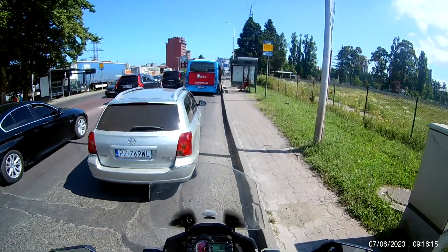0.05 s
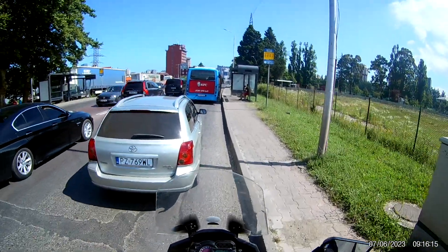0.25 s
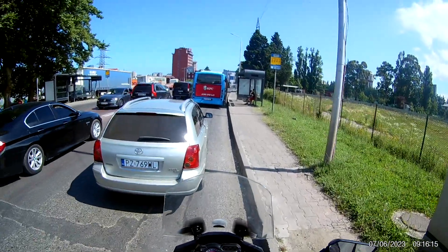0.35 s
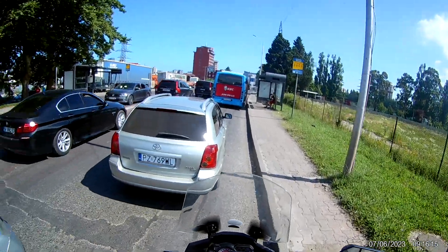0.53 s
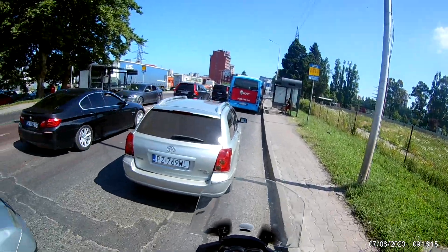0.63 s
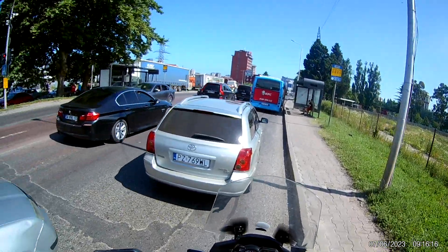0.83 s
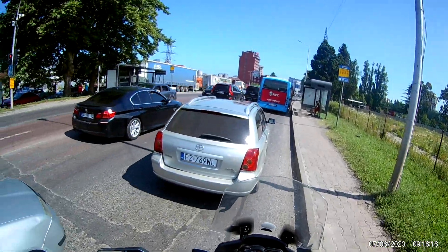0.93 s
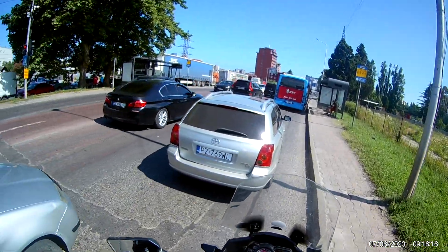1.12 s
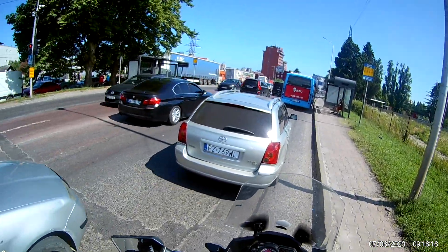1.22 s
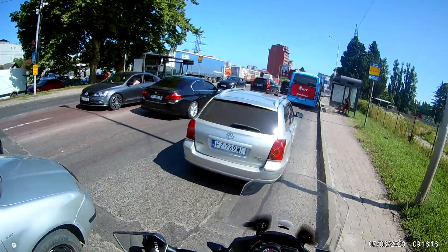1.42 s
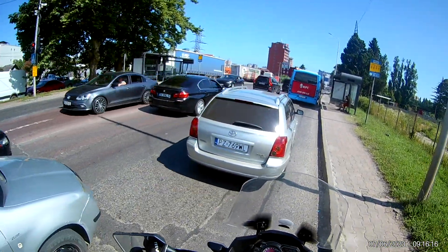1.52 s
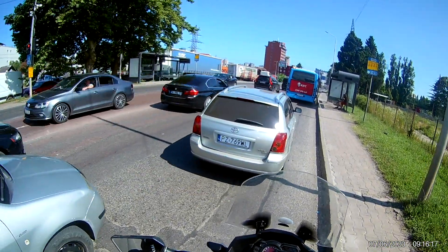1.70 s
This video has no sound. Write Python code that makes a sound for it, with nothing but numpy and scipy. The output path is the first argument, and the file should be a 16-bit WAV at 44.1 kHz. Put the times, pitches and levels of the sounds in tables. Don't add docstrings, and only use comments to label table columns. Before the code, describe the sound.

One nearby electric horn beeps for about a third of a second with faint echoes, over constant low motorcycle idle and muffled traffic; later soft tyre noise passes and a neighbouring engine revs faintly.

```python
import sys
import numpy as np
from scipy import signal
from scipy.io import wavfile
from scipy.ndimage import uniform_filter1d

SR = 44100
rng = np.random.default_rng(int(sys.argv[2]) if len(sys.argv) > 2 else 0)


def ratio_of_db(decibels):
    return 10 ** (np.asarray(decibels, float) / 20)


def transcribe(signal):
    frames = np.atleast_2d(signal).T
    limited = np.clip(frames, -1, 1)
    pcm = np.round(limited * 32767).astype(np.int16)
    wavfile.write(sys.argv[1], SR, pcm)


N = 77175


def walk(rate_hz):
    hold = int(SR / rate_hz)
    steps = np.repeat(rng.standard_normal(N // hold + 1), hold)
    return 4 / 3 * uniform_filter1d(uniform_filter1d(steps, hold), hold)[:N]


def level(x, db):
    return x * ratio_of_db(db) / np.sqrt(np.mean(x ** 2))


def band(hz, width_hz):
    edges_hz = [hz - width_hz / 2, hz + width_hz / 2]
    sos = signal.butter(2, edges_hz, "bandpass", fs=SR, output="sos")
    return signal.sosfilt(sos, rng.standard_normal(N + SR // 2))[-N:]


# frequency in Hz, level in dB per Hz.
ROAR_SPECTRUM = [(25, 5.5), (55, 1), (130, -8), (400, -6.5), (750, -17), (1900, -17), (2900, -25),
                 (4400, -67)]
ROAR_DB, SWELL_DB, FLICKER_DB = -48.5, 0.3, 1.5


def traffic_roar():
    table_hz, table_db = np.array(ROAR_SPECTRUM).T
    roar, swell = 0, walk(0.53)
    for hz in 24 * 2 ** (np.arange(24) / 3):
        db = np.interp(np.log(hz), np.log(table_hz), table_db)
        gain = ratio_of_db(db + SWELL_DB * swell + FLICKER_DB * walk(10.95))
        roar = roar + gain * band(hz, hz / 4)
    return level(roar, ROAR_DB)


# loudest moment in seconds, width in seconds, centre in Hz, bandwidth in Hz.
PASSES = [
    (1.19, .09, 1150, 300),
    (1.36, .04, 1150, 260),
    (1.7, .12, 380, 200),
    (1.65, .08, 980, 120),
    (1.5, .1, 640, 90),
]
PASS_DB = [-57.5, -56, -56.5, -63.5, -60]


def passing_cars(t):
    cars = 0
    for (peak_s, width_s, hz, width_hz), db in zip(PASSES, PASS_DB):
        swell = np.exp(-0.5 * ((t - peak_s) / width_s) ** 2)
        cars = cars + swell * level(band(hz, width_hz), db)
    return cars


DRONE_ON_S, DRONE_RISE_S, DRONE_DB = 1.56, 0.05, -52
DRONE_HZ, DRONE_CLIMB_HZ_S = 241, 50


def revving_neighbour(t):
    age = np.clip(t - DRONE_ON_S, 0, 9)
    hz = DRONE_HZ + DRONE_CLIMB_HZ_S * age + 3 * walk(25.3)
    drone = np.sin(2 * np.pi * np.cumsum(hz) / SR)
    return drone * np.clip(age / DRONE_RISE_S, 0, 1) * ratio_of_db(DRONE_DB + 2.1 * walk(19.6))


# time in seconds, firings per second.
IDLE_SPEED = [(.13, 36.6), (.345, 37.2), (.56, 37.35), (.775, 36.9), (.99, 37.3), (1.2, 37.6), (1.42, 37.3),
              (1.63, 36.5)]
# frequency in Hz, level in dB, t60 in seconds.
EXHAUST_MODES = [(40, -28.5, .08), (83, -3, 0.13), (120, -5, 0.071), (190, -19, 0.077), (227, -12.5, 0.068),
                 (363, -7.5, 0.076)]
FIRST_FIRING_S, FIRING_SLIP_S, FIRING_SCATTER_DB, PUFF_S = 0.015, 0.00045, 0.5, 0.0034
THUMP_DB, CLATTER_DB, CLATTER_HZ, CLATTER_WIDTH_HZ = -43.5, -70, 1780, 1700
CLATTER_DECAY_CYCLES = 0.3


def idling_engine(t):
    firings = np.cumsum(np.interp(t, *np.array(IDLE_SPEED).T)) / SR
    first = np.interp(FIRST_FIRING_S, t, firings)
    slip, scatter = rng.standard_normal((2, 80))
    times = np.interp(first + np.arange(80), firings, t, right=9) + FIRING_SLIP_S * slip
    keep = (times > 0) & (times < t[-1])
    pulses = np.zeros(N)
    pulses[(times[keep] * SR).astype(int)] = ratio_of_db(FIRING_SCATTER_DB * scatter[keep])

    age = t[:SR // 5]
    puff = np.sin(np.pi * np.clip(age[:SR // 50] / PUFF_S, 0, 1)) ** 2
    ring = 0
    for hz, db, t60_s in EXHAUST_MODES:
        ring = ring + ratio_of_db(db - 60 * age / t60_s) * np.sin(2 * np.pi * hz * age)
    thump = signal.fftconvolve(pulses, np.convolve(puff, ring))[:N]

    cycle = (firings - first) % 1
    clatter = np.exp(-cycle / CLATTER_DECAY_CYCLES) * band(CLATTER_HZ, CLATTER_WIDTH_HZ)
    return level(thump, THUMP_DB) + level(clatter, CLATTER_DB)


# seconds, for overtones 1-3, then the rest.
HOLD_S = [-0.01, 0.0026, .012, 0.0032]
HORN_HZ, HORN_SAG_HZ, SAG_S = 474.9, 12, 0.011
HORN_ON_S, HORN_OFF_S = 0.2127, 0.4912
ATTACK_S, LATE_S_PER_ORDER, ATTACK_POWER = 0.027, 0.0018, 2.6
RELEASE_S, RING_T60_S, OVERTONE_T60_S = 0.0069, 0.24, 0.069
BRIGHT_DB_PER_ORDER, FLUTTER_DB_PER_ORDER, TOP_FLUTTER_DB = 0.5, 0.1, 4
RECEDING_SHARE, RECEDING_FADE_S, RECEDING_SHIFT = 0.35, 0.435, -0.0069
THROAT_TURNS = 0.18


def overtone_gain(t, k, db):
    late_s = LATE_S_PER_ORDER * min(k - 1, 5)
    rise = np.clip((t - HORN_ON_S - late_s) / ATTACK_S, 0, 1)
    rise = np.sin(np.pi / 2 * rise) ** ATTACK_POWER
    after = np.clip(t - HORN_OFF_S - HOLD_S[min(k, 4) - 1], 0, 9)
    t60_s = RING_T60_S if k == 1 else OVERTONE_T60_S
    fall_db = -60 * (np.hypot(after, RELEASE_S) - RELEASE_S) / t60_s
    flutter_db = FLUTTER_DB_PER_ORDER * (k - 3.5) if k < 10 else TOP_FLUTTER_DB
    bright_db = BRIGHT_DB_PER_ORDER * min(k - 1, 8)
    return rise * ratio_of_db(db + bright_db + fall_db + flutter_db * walk(30))


def car_echo(t, k, share, fade_s, fades_per_s):
    beat = 1 - np.clip(share, 0, 1) * np.exp(2j * np.pi * fades_per_s * (t - fade_s))
    if k == 6:
        shift_hz = RECEDING_SHIFT * k * HORN_HZ
        beat = beat * (1 - RECEDING_SHARE * np.exp(2j * np.pi * shift_hz * (t - RECEDING_FADE_S)))
    return beat


# overtone number, level in dB, echo share 0-1, deepest fade in seconds, fades per second.
OVERTONES = [(1, -24.4, .11, .467, 4.6), (2, -29.3, .22, .418, 6.7), (3, -31.9, .18, .374, 4.2),
             (4, -43.7, .93, .394, 1.6), (5, -39.1, .49, .363, 2.7), (6, -46.5, .4, .27, 3.2),
             (7, -59.5, .85, .277, 3.7), (8, -66, .73, .344, 1.2), (9, -78, .55, .442, 4.3)]
# overtone number, level in dB.
TOP_OVERTONES = [(10, -94.5), (11, -95), (12, -95), (13, -97), (14, -96), (15, -95), (18, -97.5), (19, -96),
                 (20, -97.5), (21, -99)]


def horn_tone(t):
    hz = HORN_HZ - HORN_SAG_HZ * np.exp(-np.clip(t - HORN_ON_S, 0, 9) / SAG_S)
    phase = 2 * np.pi * np.cumsum(hz) / SR
    tone = 0
    for k, db, share, fade_s, fades_per_s in list(OVERTONES) + [(k, db, 0, 0, 1) for k, db in TOP_OVERTONES]:
        k = int(k)
        wave = np.exp(1j * (k * phase + 2 * np.pi * THROAT_TURNS * k * k))
        echo = car_echo(t, k, share, fade_s, fades_per_s)
        tone = tone + overtone_gain(t, k, db) * np.imag(echo * wave)
    return tone


# time in seconds, level in dB.
DISC_KNOCKS = [
    (.222, -40.5),
    (.503, -43.5),
]
DISC_HZ, DISC_T60_S, DISC_RISE_S = 909, 0.24, 0.003


def horn_disc(t):
    disc = 0
    for knock_s, db in DISC_KNOCKS:
        age = np.clip(t - knock_s, 0, 9)
        gain = ratio_of_db(db - 60 * age / DISC_T60_S) * (1 - np.exp(-age / DISC_RISE_S))
        disc = disc + gain * np.sin(2 * np.pi * DISC_HZ * age)
    return disc


# delay in seconds, level in dB.
FAR_WALLS = [(.032, -23.5), (.052, -29.5), (.078, -30), (.1, -33.5), (.135, -40)]
WALL_TOP_HZ, WALL_FLUTTER_DB = 1300, 5


def horn(t):
    direct = horn_tone(t) + horn_disc(t)
    dull = signal.lfilter(*signal.butter(1, WALL_TOP_HZ, fs=SR), direct)
    echoes = 0
    for delay_s, db in FAR_WALLS:
        echoes = echoes + ratio_of_db(db + WALL_FLUTTER_DB * walk(45)) * np.interp(t - delay_s, t, dull, left=0)
    return direct + echoes


CASE_TOP_HZ = 4020


def scene():
    t = np.arange(N) / SR
    street = traffic_roar() + passing_cars(t) + revving_neighbour(t) + idling_engine(t)
    case = signal.butter(4, CASE_TOP_HZ, fs=SR, output="sos")
    return (signal.sosfilt(case, street) + horn(t))[None]


def band_limit(x):
    return signal.sosfilt(signal.butter(12, 15720, fs=SR, output="sos"), x)


MIC_LOW_HZ, HISS_LOW_HZ, HISS_DB = 24.6, 1200, -77.5


def record(dry):
    hiss = signal.lfilter(*signal.butter(1, HISS_LOW_HZ, "highpass", fs=SR), rng.standard_normal(dry.shape))
    mic = signal.lfilter(*signal.butter(2, MIC_LOW_HZ, "highpass", fs=SR), dry)
    return band_limit(mic + level(hiss, HISS_DB))


dry = scene()
out = record(dry)
transcribe(out)
```